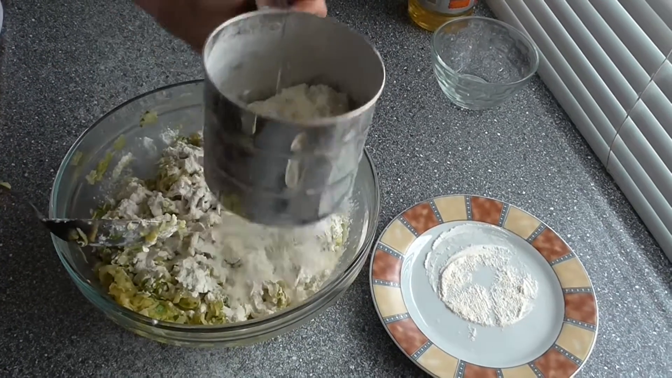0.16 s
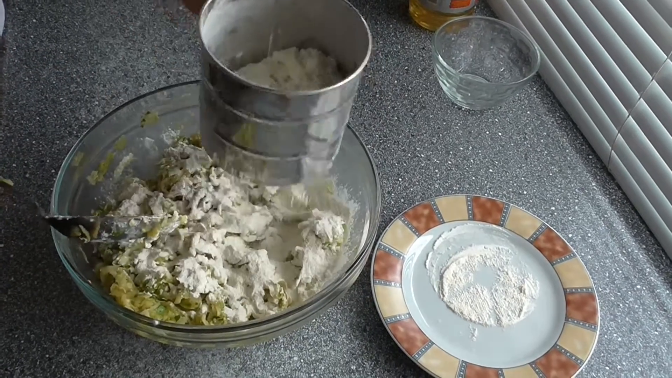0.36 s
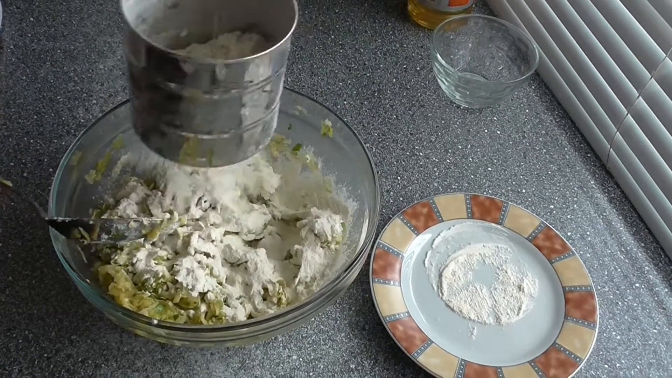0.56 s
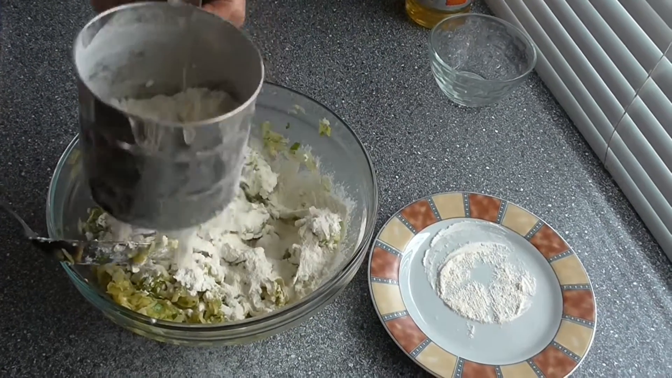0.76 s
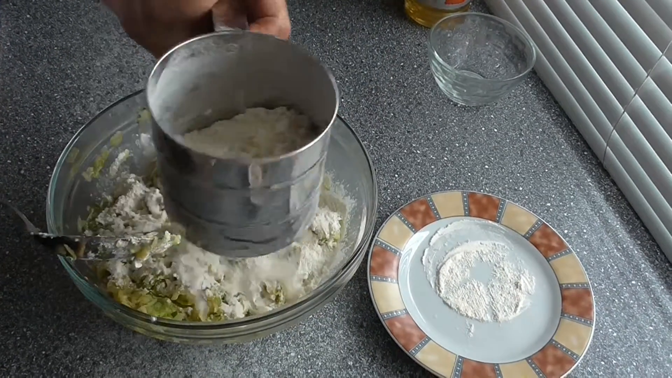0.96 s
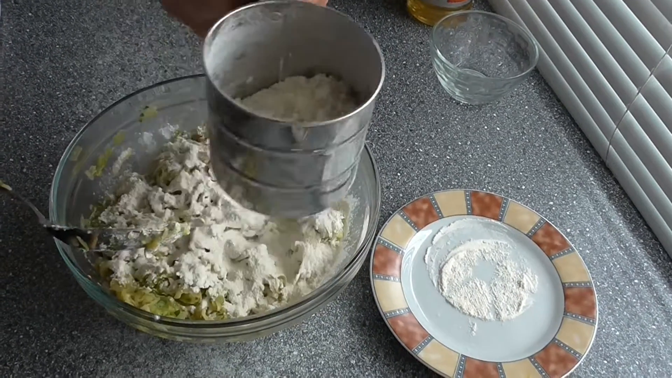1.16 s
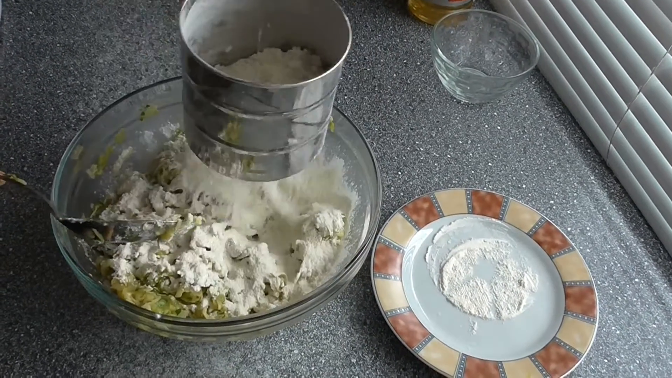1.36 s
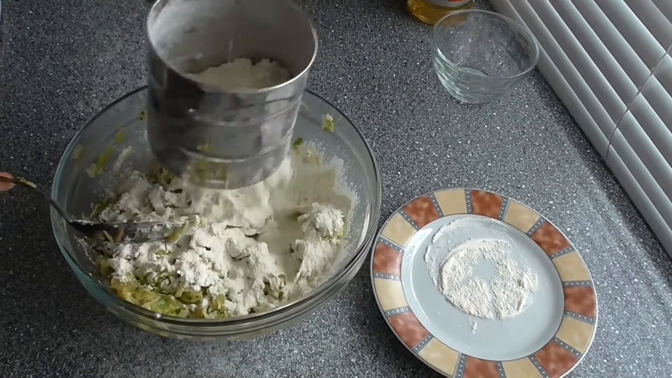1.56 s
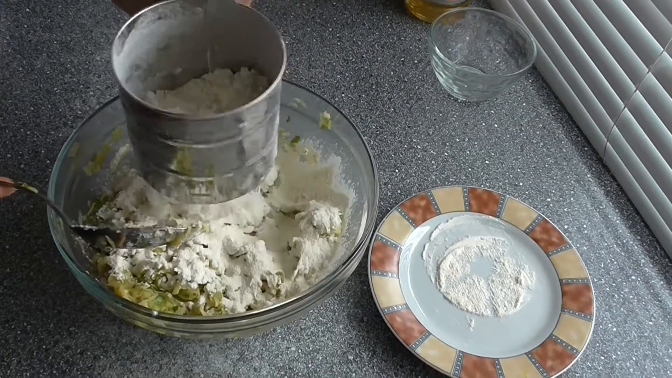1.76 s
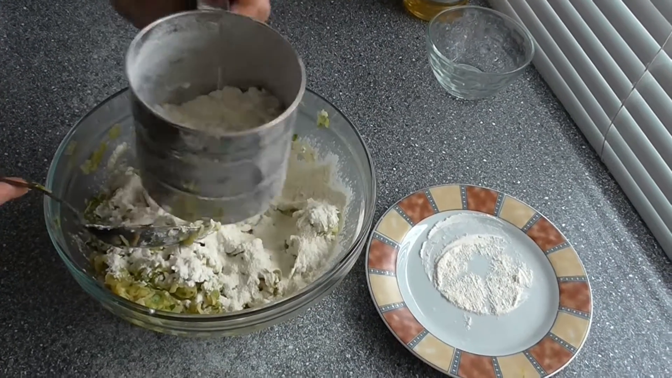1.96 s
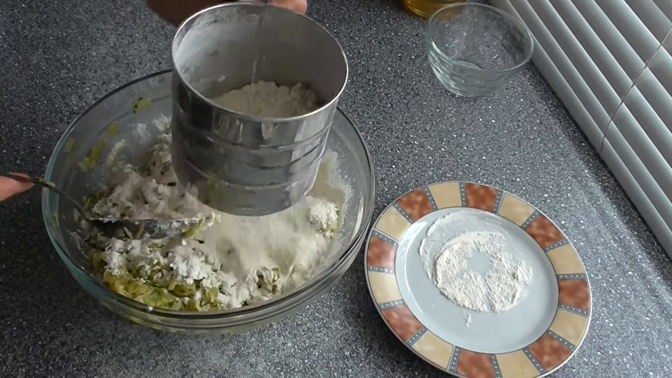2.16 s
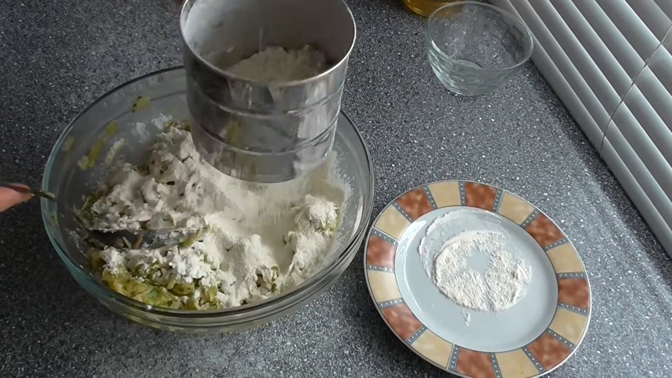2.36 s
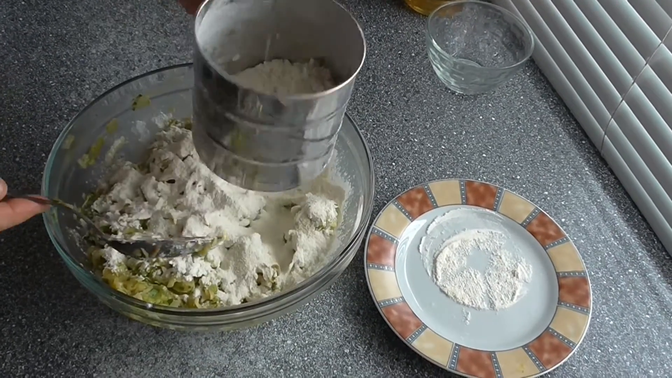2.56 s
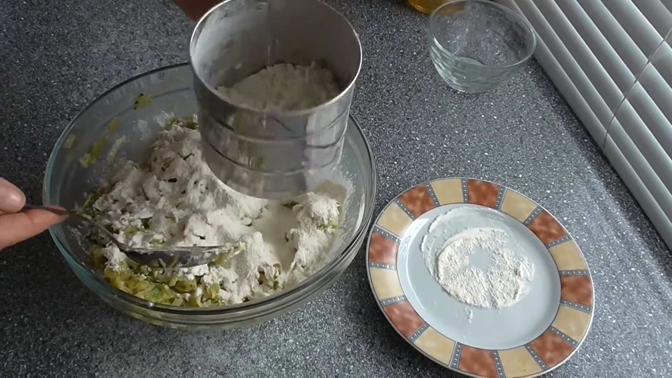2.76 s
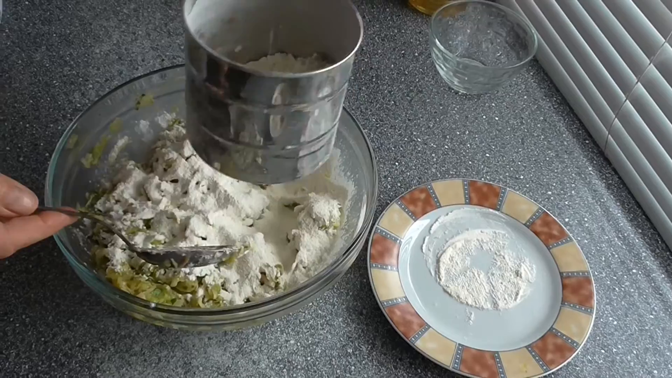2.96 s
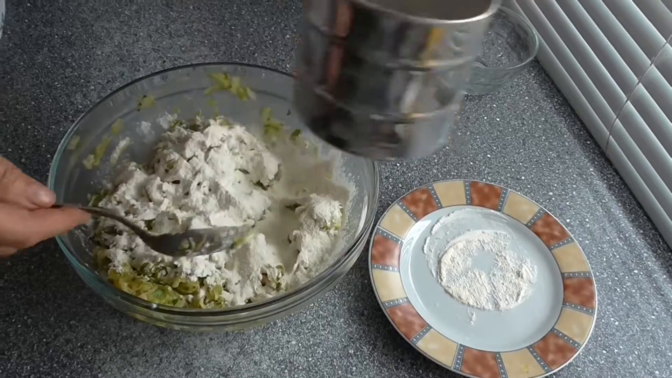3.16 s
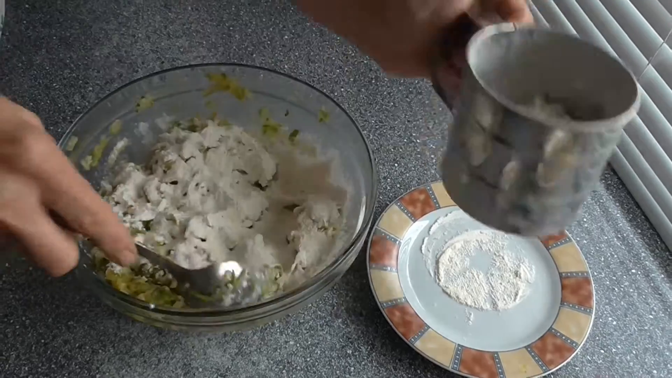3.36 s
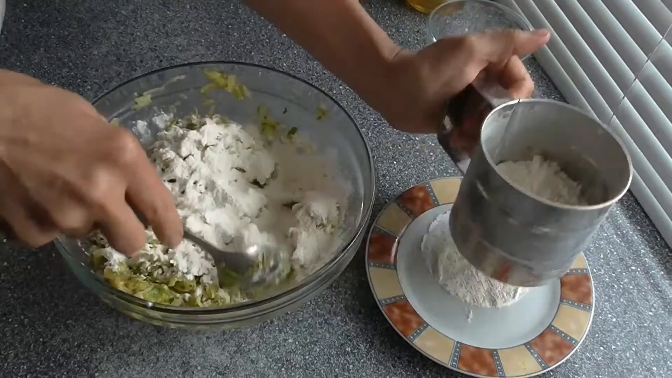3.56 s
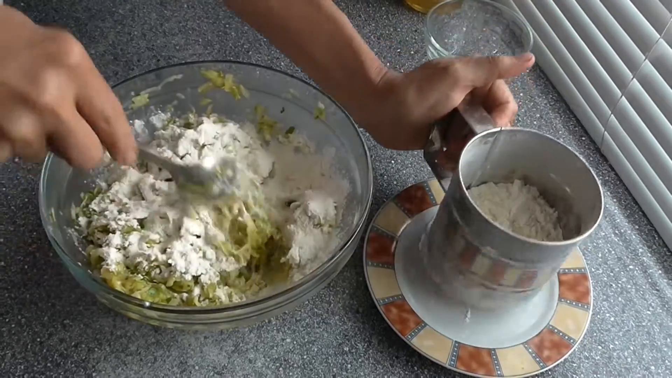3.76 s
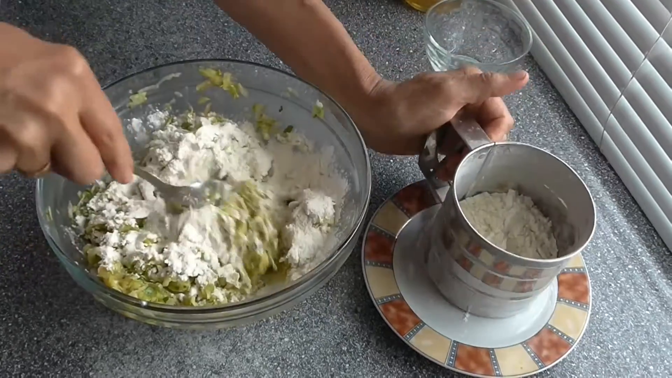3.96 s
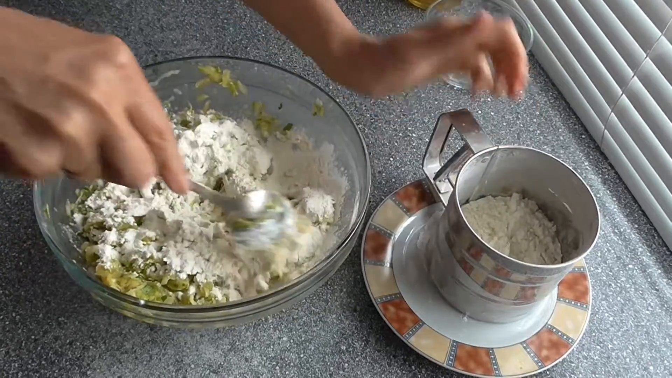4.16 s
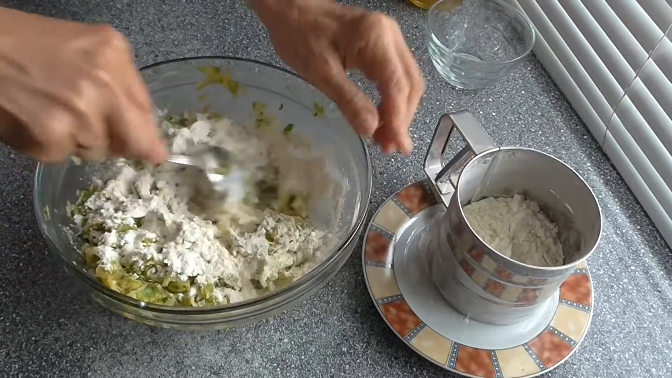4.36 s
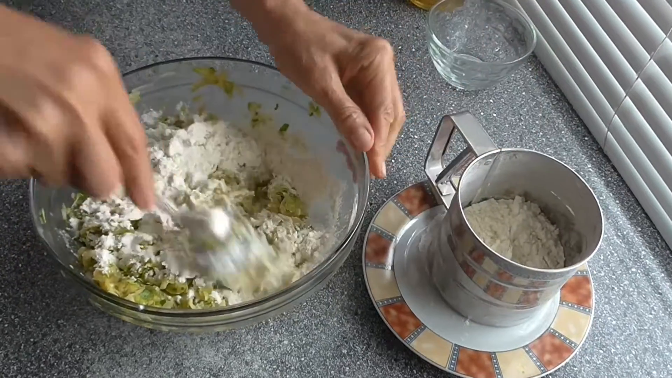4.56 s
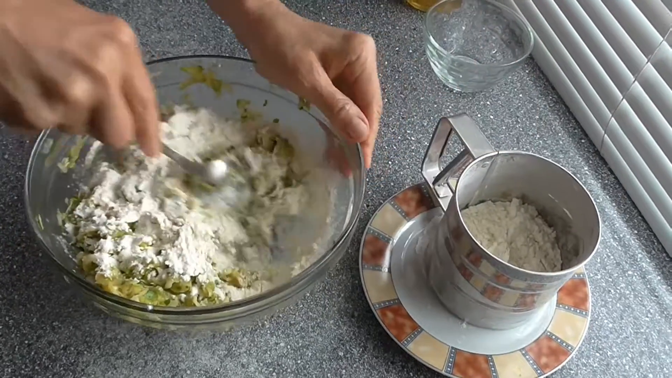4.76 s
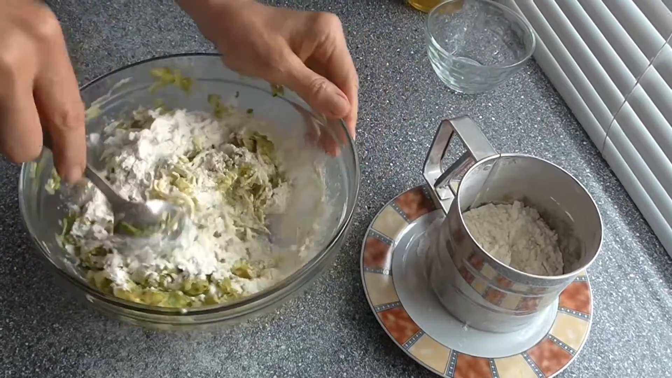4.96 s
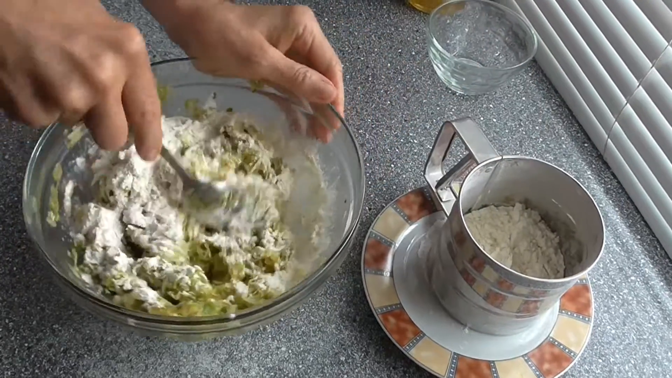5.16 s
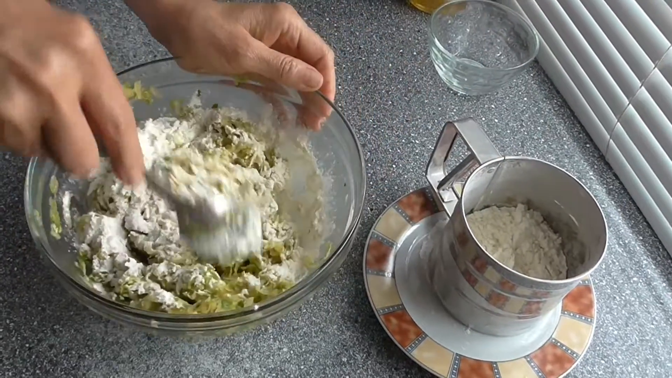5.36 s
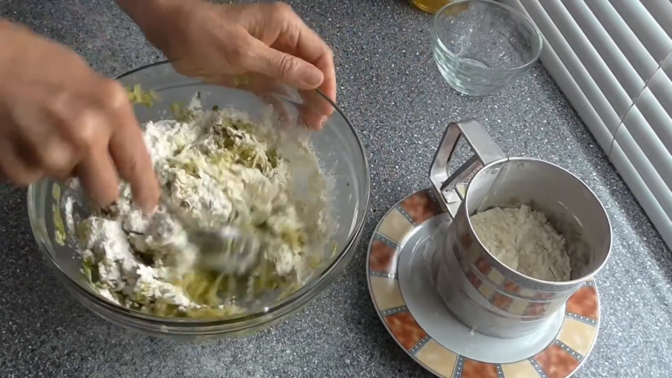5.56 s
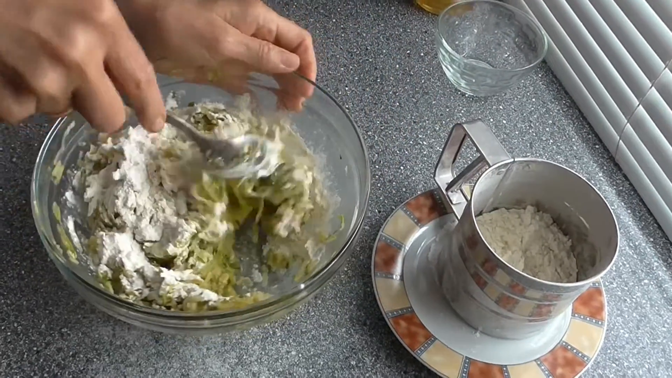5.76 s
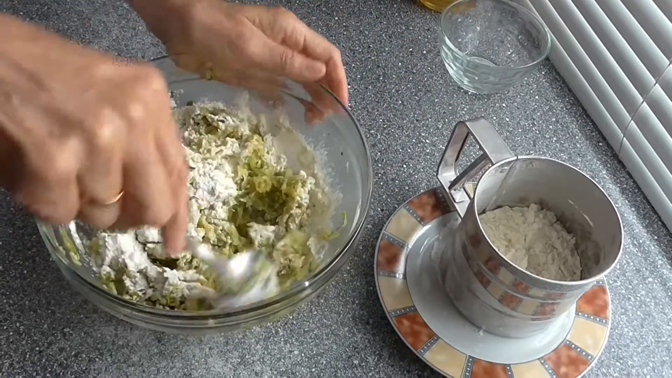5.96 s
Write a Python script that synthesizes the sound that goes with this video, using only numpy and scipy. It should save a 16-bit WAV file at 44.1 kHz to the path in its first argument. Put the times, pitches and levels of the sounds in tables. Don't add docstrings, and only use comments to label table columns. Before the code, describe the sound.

From 0 to about 2.4 seconds a squeeze-handle metal sifter is worked quickly at close range, roughly eight strokes a second counting squeezes and releases. Each is a short gritty rasp of wire over mesh with a hollow tin rattle, bright lever clicks, snagging pings and tiny spring creaks. Then it stops; a low appliance hum and airy room tone remain, with a faint traffic swell around 3 seconds and distant falling bird chirps near 2.9 and 3.5. From 3.6 a spoon ticks and crackles softly in dry crumbs. At 4.0 the can clanks down on a plate, the loudest event, ringing briefly under the hand, with a small second tick. Spoon scrapes swell and fade from 4.2 to 6.1 in a glass bowl, which judders at 5.2 and bumps dully from 5.6. A hard spoon knock cracks against the glass at 5.65. Short, bright kitchen reflections throughout.

```python
import sys
import numpy as np
from scipy import signal
from scipy.fft import rfft, irfft, next_fast_len
from scipy.io import wavfile
from scipy.ndimage import uniform_filter1d

SR = 44100
rng = np.random.default_rng(int(sys.argv[2]) if len(sys.argv) > 2 else 0)


def materialize(psi):
    bounded = np.clip(np.atleast_2d(psi).T, -1, 1)
    quanta = np.round(bounded * 32767).astype(np.int16)
    wavfile.write(sys.argv[1], SR, quanta)


def how_loud(loudness_db):
    steps = np.asarray(loudness_db, float) / 20
    return 10 ** steps


N = 268833
TIME = np.arange(N) / SR


def rms_one(x):
    return x / np.sqrt(np.mean(x ** 2) + 1e-20)


def peak_at(x, db):
    return x * how_loud(db) / np.max(np.abs(x))


def at_hz(points, hz):
    table_hz, value = np.array(points).T
    return np.interp(np.log(np.maximum(hz, 1)), np.log(table_hz), value)


def colour(x, spectrum):
    count = x.shape[-1]
    size = next_fast_len(count)
    gain = how_loud(at_hz(spectrum, np.fft.rfftfreq(size, 1 / SR)))
    return rms_one(irfft(rfft(x, size) * gain, size)[..., :count])


def drift(rate):
    r = np.exp(-2 * np.pi * rate / SR)
    return rms_one(signal.lfilter([1], [1, -2 * r, r * r], rng.standard_normal(N + SR))[SR:])


def resonate(x, hz, width):
    r = np.exp(-np.pi * width / SR)
    top = np.array([1, 0, -1]) * (1 - r * r) / 2
    return signal.lfilter(top, [1, -2 * r * np.cos(2 * np.pi * hz / SR), r * r], x)


def high_pass(x, hz, order=2):
    return signal.sosfilt(signal.butter(order, hz, "high", fs=SR, output="sos"), x)


def grains(per_s, spread_db):
    hits = rng.random(N) < per_s / SR
    size = how_loud(spread_db * np.minimum(rng.exponential(1, N), 4))
    return hits * size * rng.choice([-1, 1], N) + 1e-9


def burst(t60, rise):
    t = TIME[:4096]
    return rng.standard_normal(4096) * how_loud(-60 * t / t60) * (1 - np.exp(-t / rise))


def crack(spectrum, t60):
    return colour(rng.standard_normal(4096), spectrum) * how_loud(-60 * TIME[:4096] / t60)


def modes(table, db):
    t = TIME[:SR // 2]
    return sum(how_loud(db + level_db - 60 * t / t60) * np.sin(2 * np.pi * hz * t) * rng.choice([-1, 1])
               for hz, level_db, t60 in table)


def add(out, s, sound):
    i = round(s * SR)
    out[i:i + len(sound)] += sound[:N - i]


# (frequency [Hz], width [Hz], level [dB])
CAN_MODES = [(335, 220, -12), (510, 72, -6), (631, 150, -4.5), (724, 75, 0), (791, 111, 2), (854, 64, 4.5),
             (890, 78, 1.5), (992, 88, -1), (1113, 79, -9), (1200, 78, -6.5), (1334, 130, -10),
             (1420, 115, -9.5), (1636, 164, -13.5), (1876, 144, -10.5), (2062, 156, -12.5),
             (2160, 730, -28)]


def can(force, upper_db):
    upper = np.array(CAN_MODES)[:, 0] > 1150
    gains = how_loud(2.0 * rng.standard_normal(len(CAN_MODES)) + upper_db * upper)
    return sum((-1) ** k * gains[k] * how_loud(db) * resonate(force, hz, width)
               for k, (hz, width, db) in enumerate(CAN_MODES))


# (time [s], full speed after [s], length [s], effort [dB])
STROKES = [(0.0, 0.0016, 0.025, -25), (0.144, 0.026, 0.046, -30), (0.249, 0.036, 0.053, -29),
           (0.413, 0.026, 0.046, -29.5), (0.525, 0.029, 0.064, -32), (0.684, 0.028, 0.045, -29.5),
           (0.8, 0.012, 0.066, -33), (0.9473, 0.021, 0.052, -31), (1.073, 0.034, 0.046, -27.5),
           (1.2442, 0.033, 0.04, -28), (1.348, 0.023, 0.049, -29.5), (1.507, 0.036, 0.047, -28),
           (1.607, 0.027, 0.046, -28), (1.7716, 0.03, 0.049, -29), (1.873, 0.024, 0.046, -27.5),
           (2.0448, 0.037, 0.054, -28.5), (2.152, 0.022, 0.043, -28), (2.3217, 0.025, 0.049, -31)]
START_SPEED = (.55, .2)


def shaken_can():
    release_db = (0.5, -2)
    out, t = np.zeros(N), TIME[:8192]
    catches = grains(1600, 3.4) * how_loud(2.0 * drift(70))
    for k, (s, crest, length, db) in enumerate(STROKES):
        moments = [0, .005, crest - .012, crest, length, length + .008]
        swing = np.array([0, .3 * START_SPEED[k % 2], .5, .85, .35, 0])
        shake = np.interp(t, moments, how_loud(db) * swing)
        shaken = can(shake * catches[round(s * SR):][:8192], upper_db=1)
        even = np.linalg.norm(shake) / np.linalg.norm(shaken)
        add(out, s, shaken * even * how_loud(release_db[k % 2]))
    return out


# (frequency [Hz], level [dB per Hz])
MESH_SPECTRUM = [(1470, 3), (2500, -12), (3100, -7.5), (4790, -6), (5710, -15), (6180, -6.5), (10400, -6.5),
                 (11900, 0), (15700, -13), (16000, -20), (16700, -60)]
# (frequency [Hz], width [Hz], level [dB])
WIRE_RINGS = [(3700, 880, -27), (4750, 4500, -2.5), (5260, 610, -2), (6300, 2900, -2.5), (7700, 440, -2.5)]


def mesh_rasp():
    below_can_db = (-5.5, -7.5)
    fade_s, trickle = 0.012, 0.15
    hiss = np.zeros(N)
    for k, (s, crest, length, db) in enumerate(STROKES):
        moments = s + np.array([-.004, .002, crest, length, length + 0.0029, length + fade_s])
        speed = np.array([0, START_SPEED[k % 2], 1.1, .55, trickle, 0])
        hiss += np.interp(TIME, moments, how_loud(db + below_can_db[k % 2]) * speed)
    rasp = colour(grains(7000, 3.0), MESH_SPECTRUM)
    ringing = sum(how_loud(db + 1.0 + 3.9 * drift(60)) * resonate(rasp, hz, width) for hz, width, db in WIRE_RINGS)
    return hiss * how_loud(1.6 * drift(110)) * rms_one(1.13 * rasp + ringing)


def snap(db, hz, thump_db, t60):
    puff = burst(t60, .0006)
    edge = signal.lfilter([1, -1], [1], puff) * (.3 if hz > 7300 else .05)
    bright = edge + resonate(resonate(puff, hz * 0.86, 2800), hz * 1.19, 4900)
    nudge = can(burst(0.01, 0.00055), upper_db=-3.0)
    return peak_at(bright, db) + peak_at(nudge, db + thump_db)


# (time [s], peak level [dB], pitch [Hz])
WIRE_SNAGS = [(0.0228, -17, 6200), (0.2495, -37, 7840), (0.2632, -20, 12000), (0.289, -13.5, 6300),
              (0.5405, -20.5, 11800), (0.5604, -21.5, 6640), (0.5729, -15, 5800), (0.807, -25, 7720),
              (0.8135, -29, 7200), (0.8557, -15, 6300), (0.8557, -21.5, 3600), (0.9767, -25.5, 4620),
              (1.078, -23, 7700), (1.353, -37, 5050), (1.3568, -18.5, 12100), (1.3765, -20.5, 6950),
              (1.3894, -19, 6140), (0.012, -28, 5000), (0.5277, -45, 4430), (1.1023, -26, 6500),
              (1.2755, -36, 5950), (1.8035, -35, 5600), (2.1844, -22, 6400), (2.361, -26, 4750),
              (1.617, -21, 11500), (1.6377, -23, 9600), (1.8806, -14.5, 8750), (2.0792, -24, 7350),
              (2.159, -14, 8400)]


def wire_snags():
    out = np.zeros(N)
    for s, db, hz in WIRE_SNAGS:
        add(out, s, snap(db, hz, thump_db=-15, t60=.009))
    return out


# (time [s], peak level [dB])
SEAM_JOLTS = [(0.0146, -11.5), (0.168, -53), (0.265, -13.5), (0.282, -19), (0.44, -23), (0.53, -23.5),
              (0.547, -15), (0.559, -15), (0.716, -31), (0.834, -13.5), (0.984, -20), (1.089, -14.5),
              (1.104, -12.5), (1.112, -20), (0.885, -36), (2.193, -33), (1.276, -25.5), (1.361, -13.5),
              (1.376, -19.5), (1.544, -22), (1.623, -18.5), (1.637, -19), (1.804, -16.5), (1.904, -19),
              (2.071, -19), (2.084, -25), (2.172, -23.5), (2.184, -9.5), (2.361, -19.5), (0.817, -22.5),
              (0.854, -26), (0.973, -29), (1.351, -27), (1.532, -22), (1.57, -28), (1.89, -21),
              (2.157, -22), (2.347, -24), (2.192, -20.5), (1.796, -21), (0.71, -26), (0.436, -26),
              (0.254, -32), (1.284, -23)]


def seam_jolts():
    out = np.zeros(N)
    for s, db in SEAM_JOLTS:
        add(out, s, peak_at(can(burst(0.005, 0.0003), upper_db=3.0), db - 5))
    return out


# (frequency [Hz], width [Hz], level [dB])
LEVER_RING = [(847, 38, -1), (1860, 71, -5.5), (3250, 260, -10.5), (5300, 180, -3)]
LEVER_SNAP_DB = [1.5, -3, 0, -3.5, 0, -2.5, -3, -4, 0]


def lever():
    out = np.zeros(N)
    for (s, *_), snap_db in zip(STROKES[1::2], LEVER_SNAP_DB):
        puff = burst(0.021, 0.0034)
        ring = sum(how_loud(db + 4.6 * rng.standard_normal()) * rms_one(resonate(puff, hz, width))
                   for hz, width, db in LEVER_RING)
        add(out, s, peak_at(ring, -26.5 + .5 * snap_db))
        add(out, s, snap(-14 + snap_db, hz=9300, thump_db=-20, t60=.014))
    return out


# (time [s], peak level [dB], pitch [Hz])
SPRING_CREAKS = [(0.255, -38, 1990), (0.413, -33.5, 1930), (0.545, -38, 1950), (0.808, -40, 2060),
                 (1.075, -40, 2000), (1.347, -34, 1980), (1.352, -36, 1980), (1.603, -47, 2090),
                 (1.611, -34, 1990), (1.874, -35, 1990), (2.154, -44, 1960), (2.361, -30.5, 2050),
                 (0.265, -36, 2010)]


def spring():
    out = np.zeros(N)
    for s, db, hz in SPRING_CREAKS:
        creak = resonate(burst(0.021, 0.003), hz, 180)
        add(out, s, peak_at(resonate(creak, hz, 530), db))
    return out


def sifter():
    return shaken_can() + mesh_rasp() + wire_snags() + seam_jolts() + lever() + spring()


# (frequency [Hz], likeness [0-1])
AIR_LIKENESS = [(30, 0.11), (80, 0.42), (240, 0.88), (950, 0.21), (3770, 0.28), (15000, 0.36)]


def room_air():
    size = next_fast_len(N)
    alike = np.clip(at_hz(AIR_LIKENESS, np.fft.rfftfreq(size, 1 / SR)), 0, .99)
    mid, side = rfft(rng.standard_normal((2, size)))
    return irfft(np.sqrt(1 + alike) * mid + np.sqrt(1 - alike) * side * [[1], [-1]], size)[:, :N]


# (frequency [Hz], level [dB])
HUM_TONES = [(48.4, -65), (145.3, -64), (226.1, -59.5), (344.5, -75), (538.3, -65.5), (640.6, -68.5)]
# (frequency [Hz], width [Hz], level [dB])
FAN_WHISTLES = [(4151, 60, -84), (7913, 120, -86)]


def appliance(air):
    out = np.zeros(N)
    for hz, db in HUM_TONES:
        waver_db = (hz > 60) * 3.5 * drift(7)
        out += how_loud(db + 3 + waver_db) * np.sin(2 * np.pi * hz * TIME + 6 * rng.random())
    for hz, width, db in FAN_WHISTLES:
        out += how_loud(db) * rms_one(resonate(resonate(air[0], hz, width), hz, width))
    return out


# (time [s], peak level [dB], pitch [Hz], t60 [s])
BUMPS = [(2.104, -17, 720, 0.01), (2.13, -33, 990, 0.013), (3.485, -51.5, 1900, 0.023),
         (5.16, -39, 400, 0.013), (4.44, -39, 870, 0.027), (2.405, -30, 800, 0.033), (3.501, -45, 90, 0.12),
         (3.685, -39, 707, 0.034), (3.773, -30.5, 1500, 0.0071), (3.726, -42.5, 1700, 0.013),
         (3.829, -43.5, 1450, 0.017), (4.049, -43, 90, 0.15), (4.285, -62, 4050, 0.1),
         (4.29, -64, 3750, 0.098), (5.96, -45, 95, 0.15), (4.445, -47, 1750, 0.054),
         (4.529, -43, 980, 0.044), (4.51, -47, 1000, 0.018), (4.545, -44, 810, 0.03),
         (4.9, -46, 2600, 0.037), (4.716, -40.5, 1500, 0.024), (4.739, -38, 1900, 0.014),
         (4.695, -44, 1400, 0.013), (3.989, -32.5, 98, 0.12), (5.57, -18.5, 206, 0.078),
         (5.577, -29, 820, 0.013), (5.597, -25, 216, 0.093), (5.685, -22, 298, 0.034),
         (6.088, -19, 210, 0.034)]


def counter():
    out = np.zeros(N)
    for s, db, hz, t60 in BUMPS:
        soft_start = np.minimum(TIME[:SR // 2] * hz, 1)
        add(out, s, modes([(hz, 0, t60), (1.68 * hz, -8, t60)], db) * soft_start)
    thud_hz, thud_t60_s = 109, 0.011
    for (s, db), thud_db in zip(CAN_LANDING + GLASS_KNOCK, (-51, -18)):
        add(out, s, modes([(thud_hz, 0, thud_t60_s), (0.28 * thud_hz, -3, thud_t60_s)], db + thud_db))
    add(out, 5.16, bowl_judder())
    return out


def bowl_judder():
    length_s, slip_hz, sag_hz_per_s = 0.14, 204.5, 346
    t = TIME[:round(length_s * SR)]
    turn = 2 * np.pi * np.cumsum(slip_hz - sag_hz_per_s * t + 6 * drift(27)[:len(t)]) / SR
    steps = np.sin(turn) + 0.71 * np.sin(2 * turn) + 0.064 * np.sin(3 * turn)
    return how_loud(-32) * np.sin(np.pi * t / length_s) * steps


# (time [s], level [dB])
TRAFFIC_SWELL = [
    (2.75, -89),
    (2.95, -67),
    (3.2, -65.5),
    (3.45, -88),
    (3.7, -94),
]


def traffic(air):
    tyres = rms_one(resonate(resonate(air[::-1], 1650, 930), 1530, 690))
    return how_loud(np.interp(TIME, *np.transpose(TRAFFIC_SWELL))) * tyres


# (time [s], length [s], start [Hz], end [Hz], level [dB])
BIRD_CHIRPS = [
    (2.855, .05, 4150, 3750, -62),
    (2.9, .045, 3500, 3150, -65),
    (3.495, .055, 4600, 3900, -64),
    (3.55, .045, 3500, 3100, -64),
]


def bird():
    out = np.zeros(N)
    for s, length, start_hz, end_hz, db in BIRD_CHIRPS:
        count = round(length * SR)
        hz = np.linspace(start_hz, end_hz, count) + 90 * drift(300)[:count]
        add(out, s, how_loud(db) * np.hanning(count) * np.sin(2 * np.pi * np.cumsum(hz) / SR))
    return out


# (frequency [Hz], level [dB per Hz])
FLOOR_SPECTRUM = [(28, -29), (60, -28), (80, -3.5), (137, -18.5), (173, 3), (343, -5.5), (368, -3),
                  (549, -1.5), (781, -9), (879, -10.5), (2310, -25), (8040, -24), (15500, -34),
                  (16700, -62)]


def background():
    air = room_air()
    steady = how_loud(-49 - 3.5) * colour(air, FLOOR_SPECTRUM) + appliance(air) + bird()
    return steady * how_loud([[.6], [-.6]]) + traffic(air)


# (time [s], peak level [dB], pitch [Hz])
SMALL_TICKS = [(3.4077, -49, 8500), (3.5712, -41.5, 9300), (3.694, -43, 9150), (3.7105, -42, 13000),
               (3.7242, -33.5, 7900), (3.763, -37, 8500), (3.806, -36.5, 6950), (3.839, -36, 8000),
               (3.89, -42, 8100), (3.9, -39, 12500), (3.922, -41, 7260), (3.79, -40, 7400),
               (3.83, -44, 5300), (3.725, -36.5, 3700), (4.375, -49, 4300), (4.408, -29.5, 8300),
               (4.5484, -38, 6600), (4.722, -43, 4330), (4.8165, -41, 7200), (4.8293, -31.5, 7700),
               (4.8586, -37, 6200), (5.156, -40, 3500), (5.236, -47, 8340), (5.551, -39, 4000),
               (5.559, -35, 7100), (5.609, -42, 5800), (5.695, -36, 10500), (5.742, -29, 8500),
               (5.792, -35, 11500), (5.84, -40, 3200), (5.918, -47, 10800), (5.63, -31, 8300),
               (5.488, -49, 13300), (5.395, -40, 10000), (5.41, -45, 13000), (5.2, -45, 7600),
               (6.088, -40, 8500), (5.855, -41, 7960), (5.975, -46.5, 1240), (4.562, -52, 3700),
               (5.981, -37, 8600), (6.0476, -41.5, 5150)]


def small_ticks():
    out = np.zeros(N)
    for s, db, hz in SMALL_TICKS:
        puff = burst(.009, .0003)
        body = resonate(resonate(puff, hz, 0.56 * hz), hz, 0.56 * hz)
        add(out, s, peak_at(body + 0.016 * np.diff(puff, prepend=0), db))
    return out


# (deepest time [s], lead-in [s], run-out [s], drag level [dB], crumbs over drag [dB])
SPOON_STROKES = [(3.6, 0.071, 0.14, -72, 13), (3.73, 0.051, 0.39, -72.5, 16), (4.2, 0.13, 0.076, -44, -8),
                 (4.437, 0.073, 0.046, -59.5, 8.5), (4.537, 0.09, 0.098, -43.5, -12),
                 (4.723, 0.064, 0.11, -65, 9.5), (4.81, 0.043, 0.087, -57, -6),
                 (4.941, 0.15, 0.12, -41.5, -8.5), (5.09, 0.62, 0.1, -42, -21),
                 (5.211, 0.15, 0.29, -37, -9.5), (5.39, 0.23, 0.055, -50.5, -14),
                 (5.57, 0.05, 0.66, -70.5, 15.5), (5.802, 0.2, 0.21, -37, -13),
                 (6.1, 0.14, .05, -59.5, -3.5)]


def stirring():
    drag, crumbs = 0, 0
    for s, lead, run_out, db, crumb_db in SPOON_STROKES:
        away = np.abs(TIME - s) / np.where(TIME < s, lead, run_out)
        loss_db = -28.5 * away ** 1.75
        drag = drag + how_loud(db + loss_db)
        crumbs = crumbs + how_loud(db + crumb_db + 1.13 * loss_db)
    return drag, crumbs


# (frequency [Hz], level [dB per Hz])
RUMBLE_SPECTRUM = [(71, -35), (120, -40), (152, -4), (349, -3.5), (420, -12), (485, -0.5), (525, -8.5),
                   (1550, -11.5), (1750, -13.5), (2300, -23), (2900, -43), (3640, -66.5), (6160, -120)]
# (frequency [Hz], width [Hz], level [dB])
DRAG_MODES = [(379, 34, 6), (643, 71, 2.5), (870, 170, 3), (1417, 45, 1.5), (2300, 170, -0.5)]
# (frequency [Hz], level [dB per Hz])
CRUMB_SPECTRUM = [(1470, 0), (2500, -11.5), (2710, -5.5), (5500, -8.5), (7000, -10), (8600, -10),
                  (11800, -17.5), (15300, -20), (16300, -8), (16700, -75)]


def dragged_crumbs():
    drag_gain, crumb_gain = stirring()
    drag = colour(grains(1800, 3.0), RUMBLE_SPECTRUM)
    woken = sum(how_loud(db + 1.5 * drift(20)) * resonate(drag, hz, width) for hz, width, db in DRAG_MODES)
    rumble = how_loud(1.0 * drift(22.0) + 0.5 * drift(52)) * rms_one(0.9 * drag + woken)
    crackle = colour(resonate(grains(700, 2.0), 9100, 7800), CRUMB_SPECTRUM) * 0.5
    crackle = crackle + colour(rng.standard_normal(N), CRUMB_SPECTRUM) * 0.88
    return drag_gain * rumble + crumb_gain * how_loud(1.8 * drift(40)) * crackle


# (time [s], peak level [dB])
GLASS_KNOCK = [
    (5.6485, -9.5),
]
# (frequency [Hz], level [dB per Hz])
KNOCK_SPECTRUM = [(120, -23), (350, 10), (600, 10.5), (1400, -2), (2400, 8), (2900, -17), (3500, -7),
                  (4300, -16), (5100, 3.5), (6100, 1), (7300, -20), (8200, -22), (12500, -30), (15800, -24),
                  (16800, -38)]
# (frequency [Hz], width [Hz], level [dB])
SPOON_SHIVER = [(1500, 700, -17), (3450, 500, -19), (5100, 500, -12), (5850, 700, -11), (7100, 800, -15),
                (9300, 900, -21)]
# (frequency [Hz], level [dB], t60 [s])
BOWL_MODES = [(248, -7, 0.088), (348, -0.5, 0.091), (870, -3.5, 0.1), (1470, 11.5, 0.011),
              (2280, 6.5, 0.011), (3440, 9.5, 0.0081)]
# (time after knock [s], level [dB])
SLIDE_TAPS = [
    (-.005, -18),
    (.009, -6.5),
    (0.027, -16),
]


def glass_knock():
    out = np.zeros(N)
    for s, db in GLASS_KNOCK:
        add(out, s, peak_at(crack(KNOCK_SPECTRUM, .004), db + 3))
        add(out, s, peak_at(crack(KNOCK_SPECTRUM, 0.073), db - 20.0))
        for hz, width, shiver_db in SPOON_SHIVER:
            add(out, s, peak_at(resonate(burst(.085, .0002), hz, width), db + shiver_db))
        add(out, s, peak_at(resonate(burst(0.0024, .0001), 16000, 5000), db - 3.5))
        add(out, s, modes(BOWL_MODES, db - 12.0))
        for after_s, tap_db in SLIDE_TAPS:
            add(out, s + after_s, peak_at(crack(KNOCK_SPECTRUM, 0.012), db + tap_db))
    return out


def spoon():
    return small_ticks() + dragged_crumbs() + glass_knock()


# (time [s], peak level [dB])
CAN_LANDING = [
    (3.9884, 3),
]
# (frequency [Hz], level [dB], t60 [s])
HELD_MODES = [(357, -3, 0.08), (461, 4, 0.07), (560, 0, 0.04), (660, 6, 0.05), (845, 1, 0.037),
              (1130, 3, 0.025), (1460, 6, 0.03), (1762, 0, 0.05), (2117, 2.5, 0.06), (2660, 0, 0.035),
              (2760, -8, 0.05), (4030, -2, 0.032), (4400, -8, 0.05), (5050, 3, 0.012), (5770, -8, 0.054),
              (6920, -11, 0.06), (7860, -9, 0.07), (9650, -15.5, 0.059), (11180, -14, 0.036)]
# (frequency [Hz], level [dB], t60 [s])
PLATE_MODES = [(460, -15.5, .45), (662, -18, .4), (1109, -25, .5), (1066, -21, .45), (1270, -24, .6),
               (1475, -25, .55), (1575, -25, .6), (1868, -28, .5), (2119, -22, .52), (2643, -24, .48),
               (2705, -25, .52), (3228, -30, .5), (824, -22, .35), (4420, -35, .7), (918, -21, .42),
               (5771, -31, .45), (8560, -46, .8), (3849, -38, .6)]
# (frequency [Hz], level [dB per Hz])
LANDING_SPECTRUM = [(100, -45), (280, -20), (500, 5.5), (2600, -8.5), (2950, -22), (4000, -15), (9000, -18),
                    (15500, -30), (16700, -38)]
# (frequency [Hz], level [dB per Hz])
SHUDDER_SPECTRUM = [(200, -36), (400, 0), (900, 0), (1600, -3), (2500, -12), (2900, -28), (5500, -30),
                    (16000, -54)]


def landing():
    out, t = np.zeros(N), TIME[:SR // 2]
    for s, db in CAN_LANDING:
        chatter = how_loud(3.0 * drift(45)[:len(t)])
        settling = 1 - np.exp(-t / .001)
        blow = (modes(HELD_MODES, 0) + chatter * modes(PLATE_MODES, 0)) * settling
        blow[:4096] += peak_at(crack(LANDING_SPECTRUM, 0.0076), 17.1)
        shudder = colour(rng.standard_normal(len(t)), SHUDDER_SPECTRUM) * how_loud(-60 * t / .48)
        blow += peak_at(shudder, -5.5)
        add(out, s, peak_at(blow, db))
    slide = grains(1200, 4.7)[:round(0.12 * SR)]
    woken = sum(rms_one(resonate(slide, hz, 90)) for hz, *_ in PLATE_MODES if hz > 3000)
    add(out, 4.12, how_loud(-51) * np.hanning(len(slide)) * rms_one(woken))
    bounce_s, bounce_db = 4.0578, -25
    add(out, bounce_s, peak_at(resonate(burst(0.073, 0.00059), 3600, 2200), bounce_db - 6))
    add(out, bounce_s, peak_at(resonate(burst(0.015, 0.00049), 10000, 4000), bounce_db - 3))
    return out


# (frequency [Hz], t60 [s])
ROOM_T60 = [(150, 0.64), (1000, 0.38), (3000, 0.34), (6000, 0.38), (12000, 0.14)]


def kitchen(x, wet_db):
    t, tail = TIME[:SR * 2 // 3], 0
    edges = 90 * 2 ** np.arange(0, 7.7, .7)
    for low, high in zip(edges, edges[1:]):
        band = signal.butter(2, [low, high], "band", fs=SR, output="sos")
        mid, side = signal.sosfilt(band, rng.standard_normal((2, len(t))))
        decay = how_loud(-60 * t / at_hz(ROOM_T60, np.sqrt(low * high)))
        tail = tail + (mid + 0.31 * side * [[1], [-1]]) * decay
    tail = rfft(tail * (1 - np.exp(-t / 0.00024)))
    fine, broad = (uniform_filter1d(np.abs(tail) ** 2, size=bins) for bins in (80, 1200))
    tail = irfft(tail * np.sqrt(broad / fine), len(t))[:, :-SR // 8]
    tail = tail / np.sqrt(np.sum(tail ** 2) / 2)
    return how_loud(wet_db) * signal.fftconvolve(x[None], tail, axes=1)[:, :N]


def place(x, pan_db):
    bright = high_pass(x, 1200, order=1)
    bounce = .18 * np.roll(bright, 37) - .18 * np.roll(bright, 113) + .14 * np.roll(bright, 211)
    return (x + bounce * [[1], [-1]]) * how_loud([[pan_db], [-pan_db]])


def scene():
    worked = high_pass(sifter(), 170)
    stirred = spoon() + counter()
    dropped = high_pass(landing(), 240)
    direct = place(worked, pan_db=-0.15) + place(dropped, pan_db=-0.5) + place(stirred, pan_db=-0.1)
    muffled = signal.sosfilt(signal.butter(2, 3200, fs=SR, output="sos"), dropped) + 0.078 * dropped
    wet = kitchen(worked * how_loud(-9.0) + muffled * how_loud(-9.0) + stirred * how_loud(-10.5), wet_db=-1.0)
    return high_pass(direct + wet, 90) + background()


def roll_off(x):
    return signal.sosfilt(signal.butter(12, 16830, fs=SR, output="sos"), x)


def record(dry):
    held = dry / (1 + (dry / .88) ** 8) ** (1 / 8)
    finished = signal.sosfilt(signal.cheby2(10, 60, 16900, fs=SR, output="sos"), held)
    return roll_off(finished)


dry = scene()
out = record(dry)
materialize(out)
```